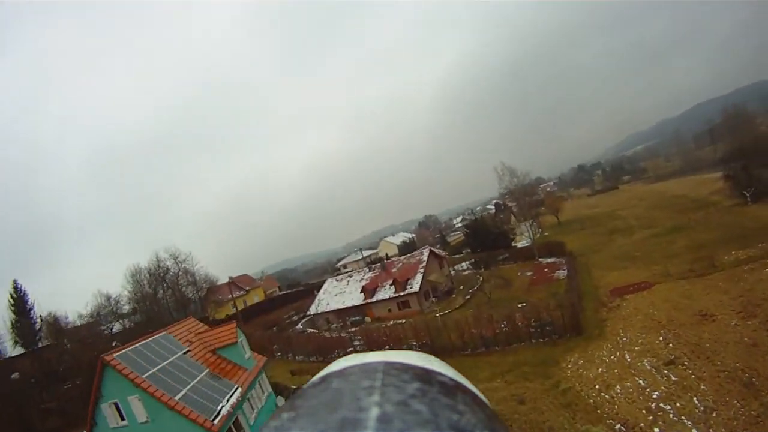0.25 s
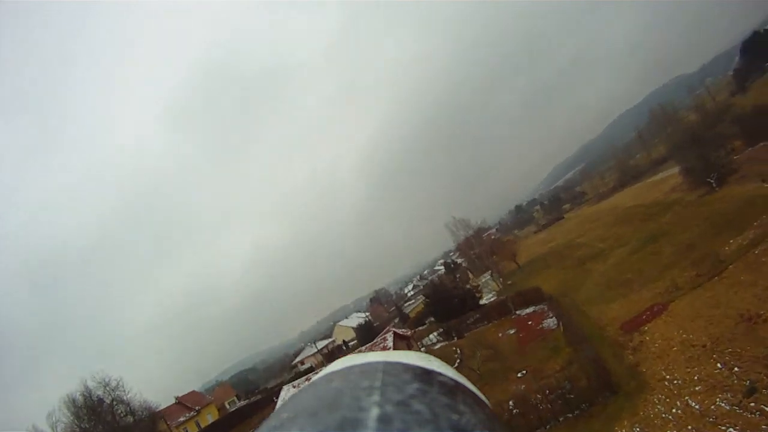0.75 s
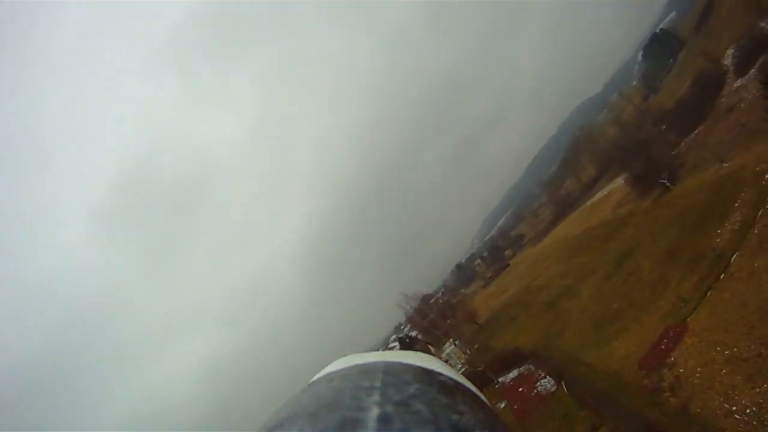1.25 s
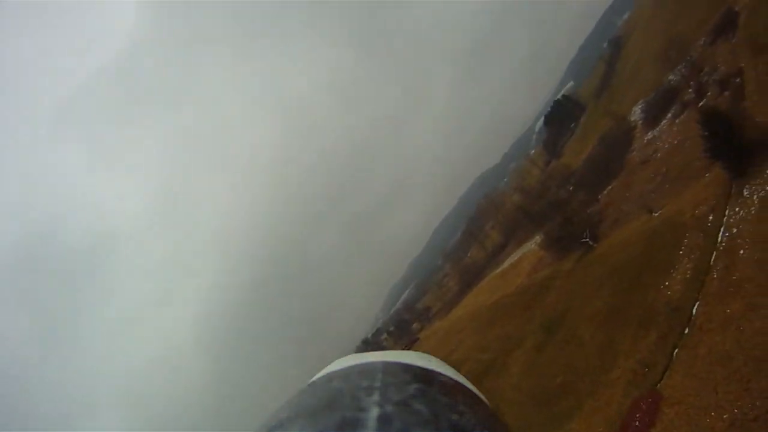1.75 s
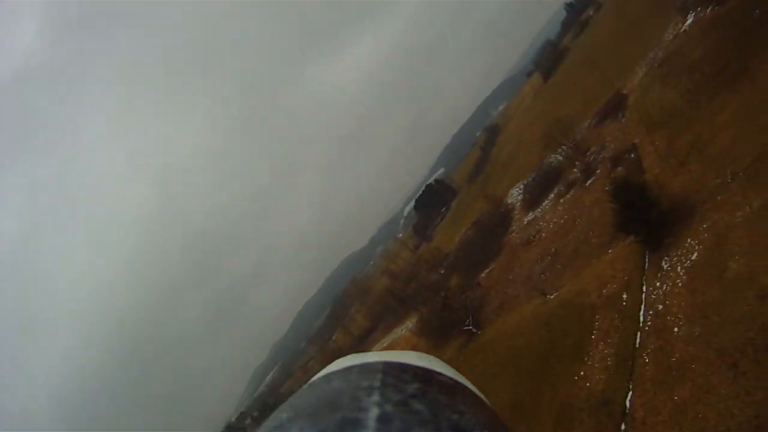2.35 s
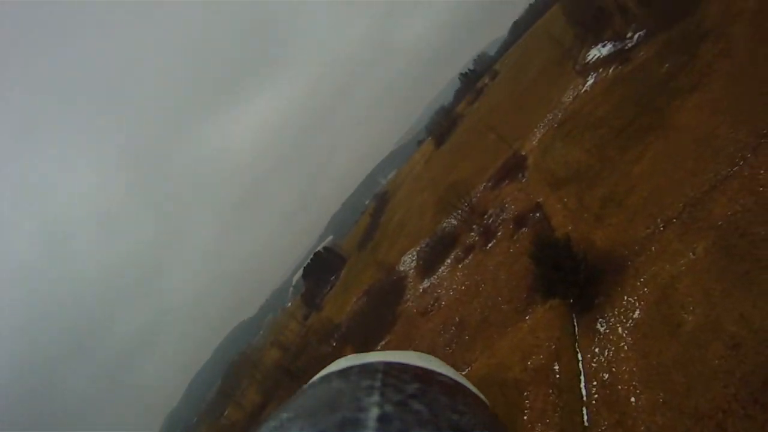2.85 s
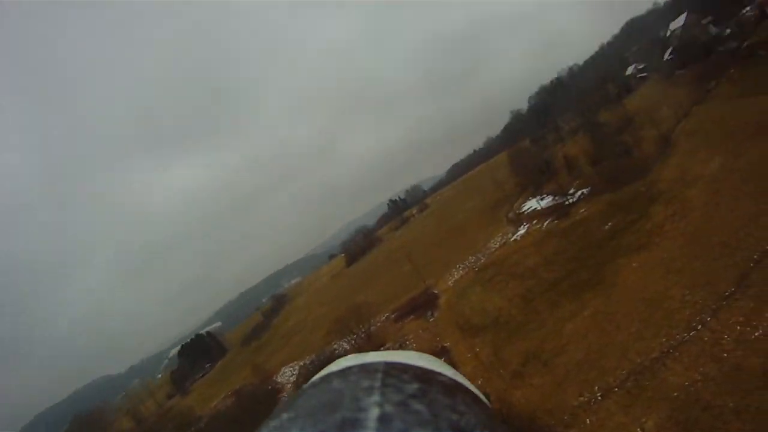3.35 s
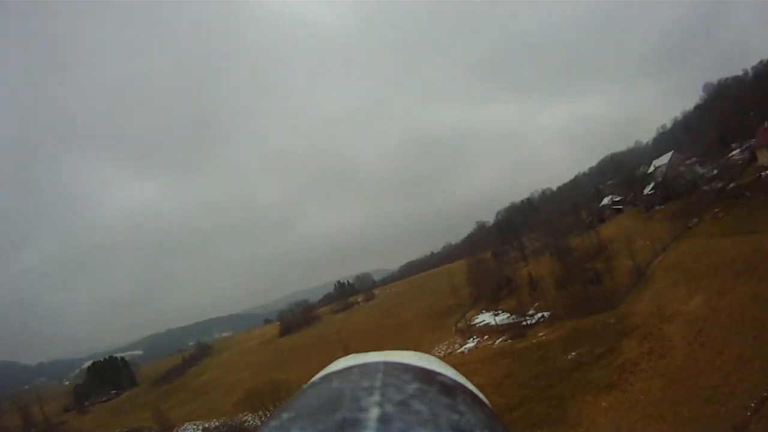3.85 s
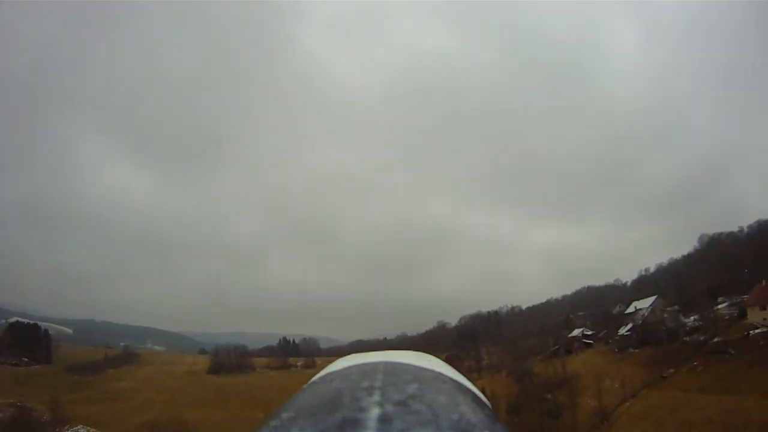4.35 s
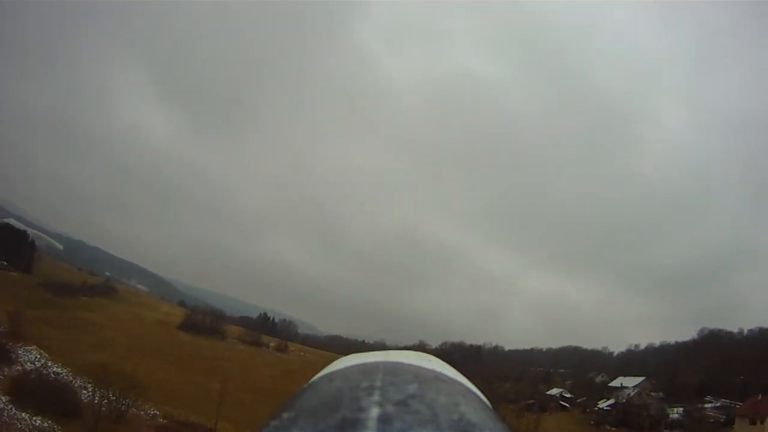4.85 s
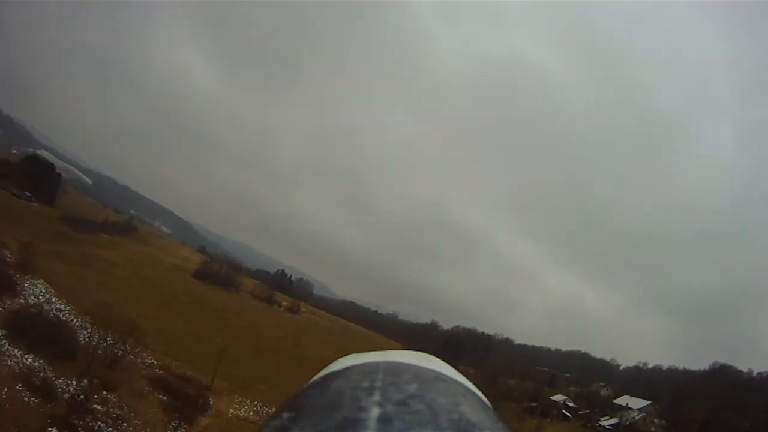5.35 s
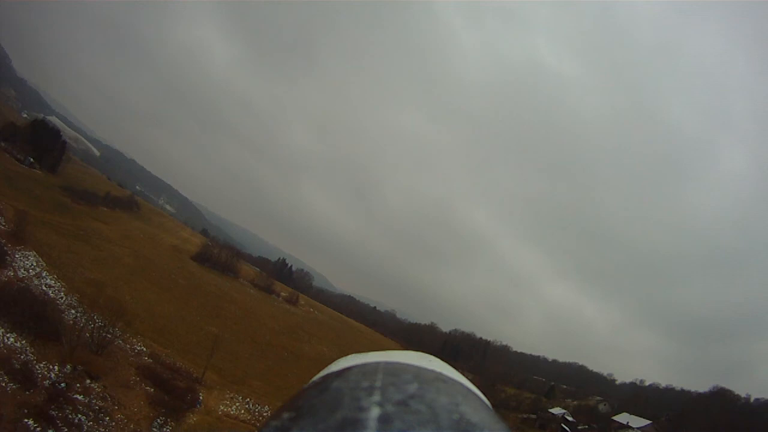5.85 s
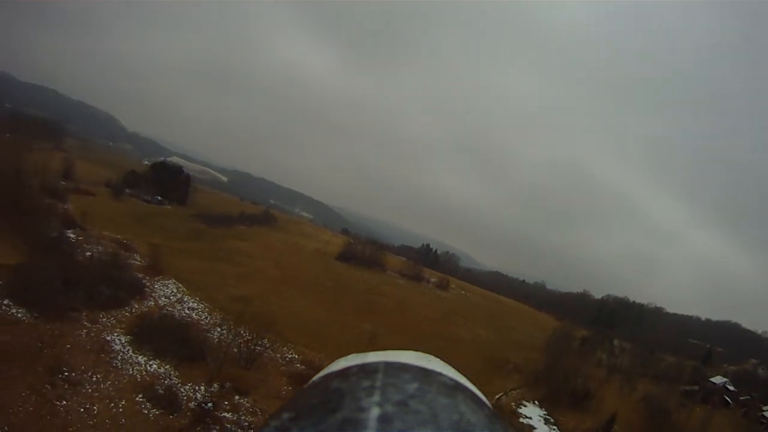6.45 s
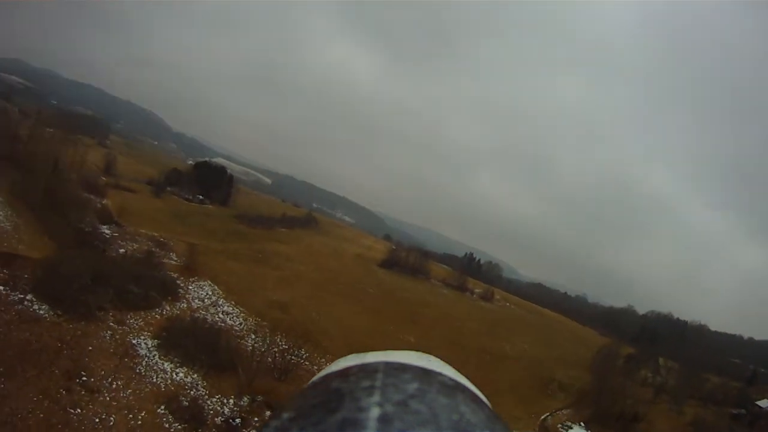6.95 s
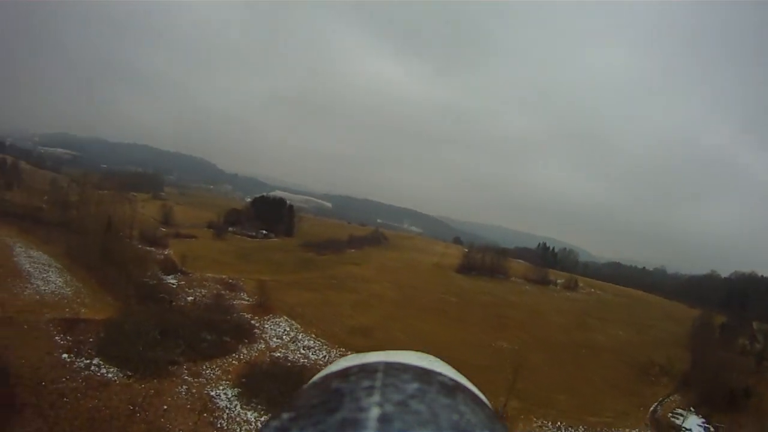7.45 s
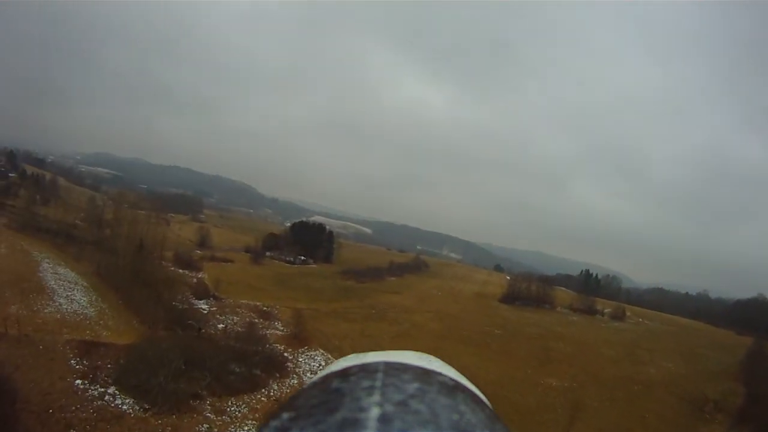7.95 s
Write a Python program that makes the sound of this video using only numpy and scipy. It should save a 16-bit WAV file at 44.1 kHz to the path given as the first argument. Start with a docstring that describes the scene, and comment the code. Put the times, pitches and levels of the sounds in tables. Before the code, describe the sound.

Heard from a microphone riding on a small electric plane outdoors: a nasal propeller drone with bright whining overtones inside hollow, mid-heavy air roar. It starts loud, sinks and drops slightly in pitch, swells again midway, thins out, then returns abruptly around six seconds, dips and rises once more. Tiny loose-part ticks and a faint high electronic whistle sit underneath.

```python
"""A two-blade propeller of a small electric plane sings at multiples of its shaft speed, each a sum of cosines.
Around it gusty slipstream, made of shaped noise, roars through the resonances of the hollow fuselage
on which the microphone rides. Even motor noise lies beneath, a loose part ticks as decaying modes,
the electronics whistle near 6 kHz as a slipping sine, and faint high orders of the motor coils sound."""
import sys
import numpy as np
from scipy import signal
from scipy.fft import rfft, irfft
from scipy.io import wavfile

SR = 44100
rng = np.random.default_rng(int(sys.argv[2]) if len(sys.argv) > 2 else 0)


def unload_audio(sound):
    """Save the sound as a 16-bit wav file, at the path given as the first command line argument."""
    columns = np.transpose(np.atleast_2d(sound))
    # keep every value between -1 and 1, then stretch to whole-number steps
    steps = np.round(np.clip(columns, -1, 1) * 32767)
    wavfile.write(sys.argv[1], SR, steps.astype(np.int16))


N = 361619


def from_db(db):
    """Logarithmic level: decibels to amplitude gain."""
    return 10 ** (np.asarray(db) / 20)


def rms_one(x):
    """Normalization of power: scale to rms 1."""
    return x / np.sqrt(np.mean(x ** 2) + 1e-20)


def in_time(rows):
    """Linear interpolation: each column of a curve table, one value a sample."""
    s, *columns = np.transpose(rows)
    return [np.interp(np.arange(N) / SR, s, c) for c in columns]


def drift(rate):
    """Low-passed random process of spread 1: coarse noise through two poles with corners at rate, in Hz."""
    step = 20   # samples between coarse values
    r = np.exp(-2 * np.pi * rate * step / SR)
    noise = rng.standard_normal(N // step + 3002)
    slow = signal.lfilter([1], [1, -2 * r, r * r], noise)[3000:]   # drop the settling
    return np.interp(np.arange(N) / step, np.arange(len(slow)), rms_one(slow - slow.mean()))


def follow(control_db, rule):
    """Proportional modulation: a mean level plus a share of a control's swing about its own mean."""
    mean_db, share = rule
    return mean_db + share * (control_db - control_db.mean())


def resonance(x, hz, width):
    """Damped oscillator: a two-pole resonance with gain 1 on top."""
    r = np.exp(-np.pi * width / SR)
    pole_pair = [1, -2 * r * np.cos(2 * np.pi * hz / SR), r * r]
    return signal.lfilter([(1 - r * r) / 2, 0, (r * r - 1) / 2], pole_pair, x)


def rung(modes):
    """Modal response to random forcing: separate noise rings each resonance."""
    return sum(from_db(db) * rms_one(resonance(rng.standard_normal(N), hz, width))
               for hz, width, db in modes)


def coloured(spectrum, patchy_db, clicks=0):
    """Spectral shaping: noise and clicks, with overlapping bands that flicker independently; rms 1."""
    hz, level = np.transpose(spectrum)
    freq = np.maximum(np.arange(N // 2 + 1) * SR / N, 1)
    shape_db = np.interp(np.log(freq), np.log(hz), level, left=-90, right=-90)
    shaped = rfft(rng.standard_normal(N) + clicks) * from_db(shape_db)
    third = 3 * np.log2(freq)   # frequency counted in thirds of an octave
    first = int(3 * np.log2(max(hz[0], 200)))
    last = int(3 * np.log2(hz[-1]))
    out = np.zeros(N)
    for k in range(first, last + 2, 2):
        share = np.clip(1 - abs(third - k) / 2, 0, 1)
        out += (from_db(patchy_db * drift(16)) - 1) * irfft(shaped * share, N)
    return rms_one(out + irfft(shaped, N))


# Shaft rotation. Each row: time in seconds, speed in turns per second.
SHAFT_SPEED = [(0.0, 191.3), (0.4, 191.9), (0.8, 190.4), (1.1, 189.3), (1.6, 186.0), (1.9, 185.8),
               (2.3, 183.3), (2.48, 184.2), (2.62, 189.4), (2.85, 191.1), (3.25, 188.8), (3.5, 191.1),
               (3.85, 193.5), (4.12, 191.5), (4.3, 192.1), (4.65, 191.8), (5.0, 188.4), (5.45, 188.4),
               (6.0, 191.1), (6.6, 191.4), (6.8, 190.5), (7.05, 192.7), (7.5, 195.0), (7.62, 194.3),
               (7.8, 195.5), (7.92, 195.0), (8.2, 196.0)]


def shaft():
    """Phase as the integral of frequency: shaft angle in radians and speed in turns per second."""
    speed, = in_time(SHAFT_SPEED)
    return 2 * np.pi * np.cumsum(speed) / SR, speed


# Narrow panel resonances that lift a passing order. Each row: centre in Hz, width in Hz.
PANELS = [(760, 10), (780, 12), (1328, 16), (1362, 35), (1562, 25), (2850, 36), (13870, 260)]
# Greatest lift by each panel, in dB.
PANEL_LIFTS_DB = [5.1, 7.5, 4, 10.2, 9.3, 7.1, 19]


def panel_lift(hz_now):
    """Resonant amplification: the lift in dB of a tone as it passes the panel resonances."""
    return sum(top_db / (1 + (2 * (hz_now - hz) / width) ** 2)
               for (hz, width), top_db in zip(PANELS, PANEL_LIFTS_DB))


# The three clearest tones. Each row: time in seconds, then the levels of blade pass,
# sixth order and ninth order in dB before their waver.
CLEAR_TONES = [(0.0, -23.5, -29, -22), (0.4, -24.5, -27.5, -21), (0.8, -24.5, -27, -23),
               (1.1, -26.5, -23, -31), (1.5, -30, -34, -40), (2.0, -30, -38, -43),
               (2.45, -31.5, -34.5, -42), (2.75, -28.5, -26, -28), (3.3, -26, -30, -43),
               (3.7, -25, -30.5, -33), (4.15, -26.5, -28.5, -32), (4.45, -26, -27.5, -42),
               (4.85, -31, -30.5, -37), (5.5, -33, -40, -35), (5.85, -30.5, -36, -32),
               (6.0, -26.5, -22.5, -27), (6.3, -27, -25.5, -28), (6.75, -33, -32, -43),
               (7.0, -29.5, -25.5, -46), (7.2, -25, -28.5, -21.5), (7.6, -26.5, -33, -25.5),
               (8.2, -27, -39, -25)]
CLEAR_MULTIPLES, CLEAR_WAVER_DB = (2, 6, 9), 1.3
# The further orders, as multiples of the shaft speed.
FURTHER_MULTIPLES = (1, 3, 4, 5, 7, 8, 10, 12, 14, 15, 18, 34, 75)
# Each row, one a further order: mean level in dB before lift and waver, share of the roar's swing it follows.
FURTHER_TONES = [(-42, 0.072), (-42.5, 0.0), (-44, 0.15), (-37, 0.89), (-39.5, 0.045), (-31.5, 0.95),
                 (-40, 0.1), (-48.5, 0.77), (-57, .35), (-47, .35), (-51.5, .45), (-57, 0.31), (-78, 0.0)]
WANDER_DB, WAVER_DB = 1.5, 1.1   # slow and quick unsteadiness of each further order
# the lowest order is faint and broken until this moment, in seconds
FIRST_ORDER_START_DB, FIRST_ORDER_BROKEN_DB, FIRST_ORDER_IN_S = -5, 4, .93


def propeller(turn, speed, roar_db):
    """Fourier series of a rotating source: orders swell with gusts, ring in panels, waver in uneven inflow."""
    levels = [(k, db + CLEAR_WAVER_DB * drift(23)) for k, db in zip(CLEAR_MULTIPLES, in_time(CLEAR_TONES))]
    for k, rule in zip(FURTHER_MULTIPLES, FURTHER_TONES):
        db = follow(roar_db, rule) + panel_lift(k * speed)
        db = db + WANDER_DB * drift(2.8) + WAVER_DB * drift(20)
        if k == 1:
            early = .5 - .5 * np.tanh((np.arange(N) / SR - FIRST_ORDER_IN_S) / 0.043)
            db += (FIRST_ORDER_START_DB + FIRST_ORDER_BROKEN_DB * drift(11)) * early
        levels.append((k, db))
    out = np.zeros(N)
    for k, db in levels:
        phase_wander = 0.26 * np.sqrt(k) * drift(0.8)   # radians
        out += np.sqrt(2) * from_db(db) * np.cos(k * turn + phase_wander)
    return out


# Slipstream on the shell. Each row: time in seconds, then the levels of roar, treble
# and low buffeting in dB before their quick changes.
GUSTS = [(0.0, -13.5, -27, -33.5), (0.75, -14, -27, -31), (1.15, -17, -29.5, -35.5),
         (1.55, -21.5, -34.5, -38), (2.45, -23, -34, -39.5), (2.75, -21, -33.5, -43),
         (3.0, -19.5, -32, -36), (3.1, -17.5, -31, -38), (3.85, -14, -28, -39.5), (4.2, -15.5, -30, -37),
         (4.5, -17.5, -31.5, -37), (4.58, -19, -32.5, -41), (4.93, -24.5, -38, -42.5),
         (5.5, -25, -39.5, -48), (5.92, -23.5, -40.5, -34), (5.98, -17, -33.5, -28.5),
         (6.3, -17, -35.5, -35.5), (6.45, -22, -36.5, -39.5), (6.75, -23.5, -38, -39),
         (7.03, -21, -36, -37), (7.13, -17, -34.5, -35.5), (7.8, -16.5, -32, -41), (8.2, -17, -35.5, -54)]
# Short surges and lulls of the roar. Each row: centre in seconds, change in dB, half length in seconds.
SURGES = [(1.056, -1, 0.016), (1.145, 1.5, 0.03), (1.286, 1.5, 0.012), (1.40, 2.5, 0.016),
          (2.77, 5.5, 0.02), (2.89, 7.5, 0.013), (2.985, 3.5, 0.017), (4.64, 4, 0.02), (5.37, -5, .03),
          (5.528, -9, 0.018), (6.01, 1.5, 0.011), (6.373, -3, 0.009), (6.442, 2.5, 0.017), (6.933, 5, .025)]
SURGES_PER_S, SURGE_DEPTH_DB = 27, 0.5   # random ones: corner rate in Hz, spread


def gusts():
    """Turbulent intermittency: levels of roar, treble and buffet, and the roar's short surges, all in dB."""
    t = np.arange(N) / SR
    surge_db = sum(db * np.exp(-((t - s) / half) ** 2) for s, db, half in SURGES)
    return *in_time(GUSTS), surge_db + SURGE_DEPTH_DB * drift(SURGES_PER_S)


SLAP_SPREAD_DB = 9   # spread of slap strength, cut off at twice this


def blade_slaps(turn):
    """Periodic impulses: a click a turn as the fuller blade cuts the wake, strong ones in short runs; rms 1."""
    passes = np.flatnonzero(np.diff(np.floor(turn / (2 * np.pi))))
    strength = from_db(SLAP_SPREAD_DB * np.clip(drift(46)[passes], -2, 2))
    clicks = np.zeros(N)
    clicks[passes] = strength.mean() - strength   # departures from the mean
    return rms_one(clicks)


# Spectra of roar, low buffet, high hiss and top air. Each row: frequency in Hz, relative density in dB per Hz.
ROAR = [(420, -30.5), (720, -13), (760, -9), (936, -5.5), (1130, -3.5), (1280, -5), (1510, -0.5),
        (1690, 2.5), (2100, -6), (3600, -27.5), (4680, -27.5), (7920, -120)]
BUFFET = [(130, -15), (200, -15.5), (330, -3), (450, -4.5), (620, 1), (800, -10.5), (1050, -24)]
HISS = [(2300, 3), (3000, 1.5), (3400, 4.5), (4000, -4.5), (5000, -7), (6300, -8), (8500, -10),
        (10000, -21.5), (11000, -55)]
TOP_AIR = [(9000, 8), (10200, 4), (12000, -1), (14000, -1), (15300, -23)]
# Shell resonances rung by the slipstream. Each row: centre in Hz, width in Hz, level in dB against the roar.
SHELL = [(1535, 20, -13.5), (1663, 25, -6), (1620, 205, -15.5), (3300, 190, -32.5)]
# Fluttering high resonances. Each row: centre in Hz, width in Hz, level in dB against their shared level.
BRIGHT_RING = [(5605, 60, -3.5), (5720, 65, -2.5), (5770, 81, -6)]
# Low shell resonances. Each row: centre in Hz, width in Hz, level in dB against the rumble.
BELLY = [(102, 140, -8), (148, 29, 3), (282, 28, 13)]
# Low rumble that rings them. Each row: time in seconds, level in dB.
RUMBLE = [(0, -57.5), (1.5, -54.5), (2.4, -56.5), (2.6, -52), (3.9, -49), (4.4, -50.5), (5.45, -58.5),
          (6.0, -50.5), (6.6, -54), (7.3, -51), (8.2, -51)]
# mean dB before the opening extra, share of the treble's swing
RING_FOLLOWS_TREBLE, TOP_FOLLOWS_TREBLE = (-47, 0.75), (-61.5, .5)
TOP_START_DB, RING_START_DB, TOP_FADE_S = 17, 4.5, 1.26   # opening extras and their time constant
SLAP_SHARE = 0.29   # rms of the slaps against the noise, before shaping


def slipstream(turn, roar_db, hiss_db, buffet_db, surge_db):
    """Turbulent forcing: eddies beat on the shell in shared lumps, and each blade wake chops them."""
    opening = np.exp(-np.arange(N) / SR / TOP_FADE_S)
    ring_db = follow(hiss_db, RING_FOLLOWS_TREBLE) + RING_START_DB * opening
    top_db = follow(hiss_db, TOP_FOLLOWS_TREBLE) + TOP_START_DB * opening
    rumble_db, = in_time(RUMBLE)
    slaps = SLAP_SHARE * blade_slaps(turn)
    chop = 1 + 0.019 * np.cos(turn) + 0.17 * np.cos(2 * turn)
    lumps = rms_one(from_db(0.5 * drift(20) + 0.7 * drift(340)) * chop)
    roar_sound = rms_one(coloured(ROAR, patchy_db=0.15, clicks=slaps) + rung(SHELL))
    roar = from_db(roar_db + surge_db) * roar_sound
    flutter = from_db(0.5 * surge_db)   # quick surges reach the treble too
    hiss = from_db(hiss_db) * coloured(HISS, patchy_db=0.57, clicks=slaps / 2)
    top = from_db(top_db) * coloured(TOP_AIR, patchy_db=0.0)
    ring = from_db(ring_db + 3.0 * drift(15)) * rung(BRIGHT_RING)
    buffet = from_db(buffet_db) * coloured(BUFFET, patchy_db=1.0)
    rumble = from_db(rumble_db) * rung(BELLY)
    return lumps * (roar + flutter * (hiss + top) + buffet + ring) + rumble


# Even motor and air noise. Each row: frequency in Hz, relative density in dB per Hz.
STEADY = [(60, -51), (120, -43), (200, -21), (450, -29), (800, -4.5), (1200, 4), (1690, -1), (2300, -27),
          (2900, 4.5), (4400, -15), (7000, -22), (9500, -19), (11000, -87), (15300, -54)]
STEADY_DB = -36.5
# Shell resonances rung by the motor's even shaking. Each row: centre in Hz, width in Hz, level in dB.
MOUNT = [(2790, 140, -38.5), (5710, 64, -50), (6440, 160, -50), (4640, 200, -58), (12100, 550, -59),
         (13700, 600, -73)]


def motor_noise():
    """Stationary random vibration: even noise that stays when the gusts ease."""
    return from_db(STEADY_DB) * coloured(STEADY, patchy_db=0.0) + rung(MOUNT)


# Touches of the loose part. Each row: time in seconds, relative strength in dB.
TICKS = [(0.0623, -22), (0.3586, -23), (0.381, -19), (0.5197, -21), (0.6315, -21), (0.7786, -21),
         (2.7858, -25), (3.0114, -22), (3.058, -17), (3.0634, -21), (3.0714, -27), (3.0774, -27),
         (3.0844, -19), (3.0904, -29), (3.1094, -30), (3.4048, -28), (3.4441, -23), (3.464, -18),
         (3.5019, -18), (3.5945, -25), (5.253, -32), (5.2904, -26), (5.3434, -29), (5.444, -30),
         (5.5717, -28), (6.0702, -25), (6.1135, -29), (6.123, -22), (6.1274, -23), (6.1494, -36),
         (6.1604, -30), (6.1734, -22), (6.9232, -42)]
# Its modes. Each row: frequency in Hz, relative level in dB, decay by 60 dB in seconds.
TICK_MODES = [(7350, -19, 0.0046), (7940, 2.5, 0.014), (8350, -1, .005), (9000, -10, .004),
              (9380, 0.5, 0.01), (10100, -16, .004), (12300, -16, .004), (13700, -11, .003),
              (14500, -8, .004)]


def ticks():
    """Impulse response of damped modes: each touch strikes every mode at its own strength, with a soft onset."""
    at = [round(s * SR) for s, db in TICKS]
    strength_db = np.array(TICKS)[:, 1] - 6.5
    luck_db = rng.normal(0, 0.98, (len(at), len(TICK_MODES)))
    out = np.zeros(N)
    for k, (hz, mode_db, t60) in enumerate(TICK_MODES):
        clicks = np.full(N, 1e-18)
        clicks[at] = from_db(strength_db + mode_db + luck_db[:, k])
        r, w = from_db(-60 / (t60 * SR)), 2 * np.pi * hz / SR
        ring = signal.lfilter([0, np.sin(w)], [1, -2 * r * np.cos(w), r * r], clicks)
        out += resonance(ring, hz, 1500)   # a broad resonance softens the onset
    return out


WHISTLE_HZ, FRAME_HZ = 5998.1, 45.47   # tone before its lost cycles; one cycle is lost a frame
WHISTLE_DB, SLIP_S = -43.5, 0.0011
SLOW_SHARE = 0.28   # part of the lost cycle that drains away between slips


def whistle():
    """Phase modulation: a tone that drops one whole cycle a frame, most of it in one quick slip."""
    t = np.arange(N) / SR
    frame, place = np.divmod(t * FRAME_HZ, 1)
    slip = .5 + .5 * np.tanh((place - .5) / (FRAME_HZ * SLIP_S))
    lost = frame + SLOW_SHARE * place + (1 - SLOW_SHARE) * slip
    return np.sqrt(2) * from_db(WHISTLE_DB) * np.sin(2 * np.pi * (WHISTLE_HZ * t - lost))


# Resonances that pick out high orders of the motor's switched coils.
# Each row: centre in Hz, width in Hz, level in dB of a line on top, before its drift.
COIL_PEAKS = [(8500, 250, -61), (9200, 500, -66), (12300, 500, -71), (13100, 400, -73), (13850, 300, -69)]


def coils(turn, speed):
    """Resonant selection of harmonics: faint high orders stand out as they pass through a shell resonance."""
    out = np.zeros(N)
    shiver = 0.011 * drift(25)   # radians; small quick speed errors blur the highest lines
    for k in range(42, 75):
        gain = sum(from_db(db) / (1 + (2 * (k * speed - hz) / width) ** 2) for hz, width, db in COIL_PEAKS)
        line = np.sin(k * (turn + shiver) + rng.uniform(0, 2 * np.pi))
        out += gain * from_db(2.5 * drift(1.5)) * line
    return np.sqrt(2) * out


def scene():
    """Superposition: everything reaches one microphone through the shell."""
    turn, speed = shaft()
    roar_db, hiss_db, buffet_db, surge_db = gusts()
    out = propeller(turn, speed, roar_db + surge_db)
    out = out + slipstream(turn, roar_db, hiss_db, buffet_db, surge_db)
    out = out + motor_noise() + ticks() + whistle() + coils(turn, speed)
    return out[None]


MIC_LOW_HZ, CUTOFF_HZ = 119, 15270
OVERLOAD = .96   # height at which the input clips


def record(dry):
    """Band limiting and overload: the microphone loses deep bass, clips the highest peaks and cuts the top."""
    bass_cut = signal.butter(2, MIC_LOW_HZ, "high", fs=SR, output="sos")
    top_cut = signal.ellip(12, .3, 70, CUTOFF_HZ, fs=SR, output="sos")
    thin = signal.sosfilt(bass_cut, dry)
    return signal.sosfilt(top_cut, np.clip(thin, -OVERLOAD, OVERLOAD))


dry = scene()
out = record(dry)
unload_audio(out)
```